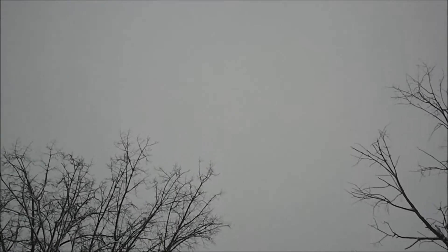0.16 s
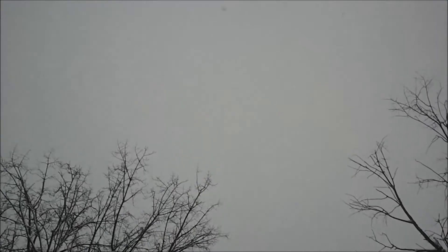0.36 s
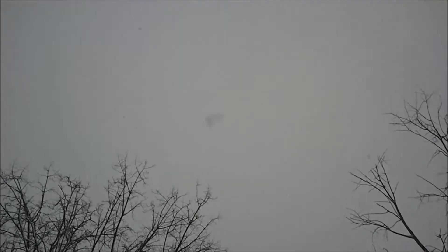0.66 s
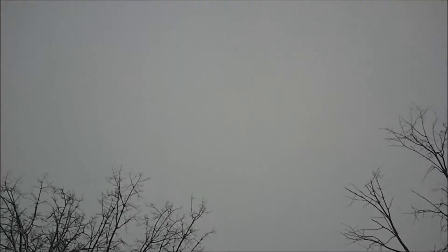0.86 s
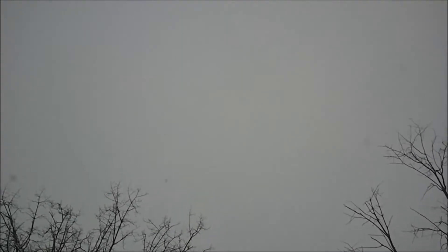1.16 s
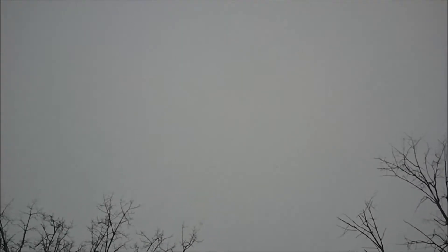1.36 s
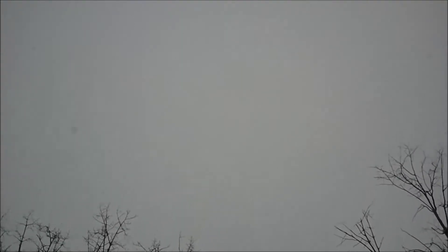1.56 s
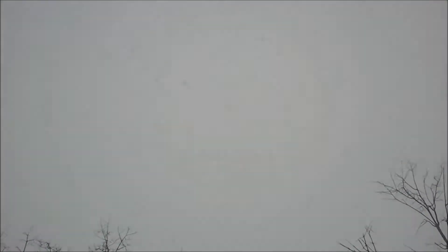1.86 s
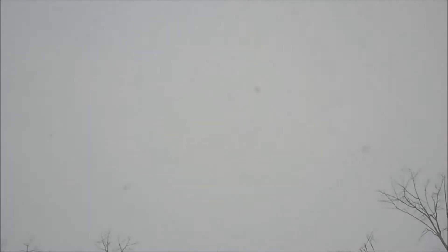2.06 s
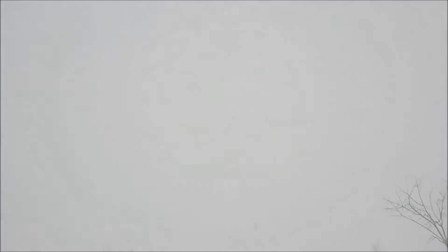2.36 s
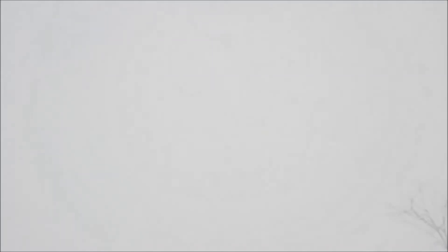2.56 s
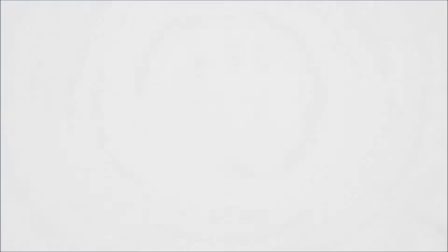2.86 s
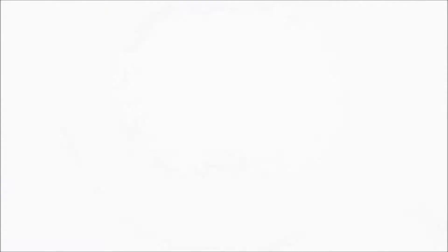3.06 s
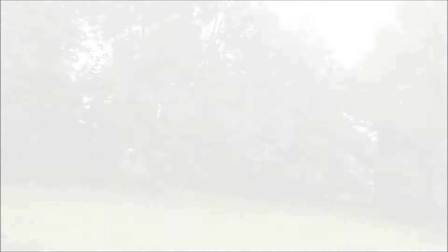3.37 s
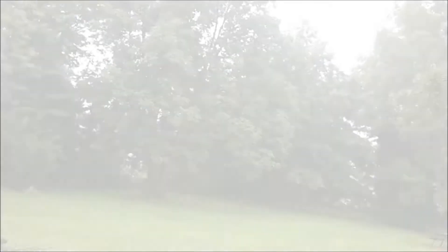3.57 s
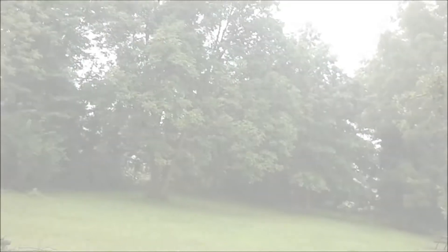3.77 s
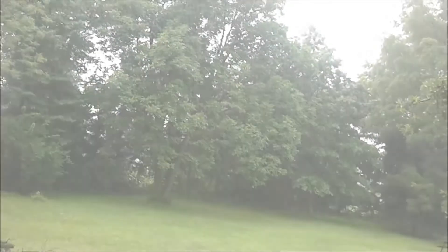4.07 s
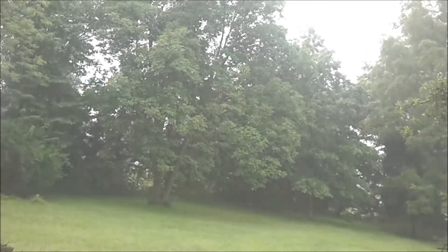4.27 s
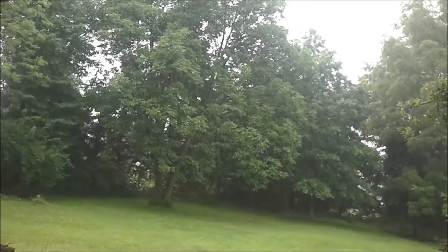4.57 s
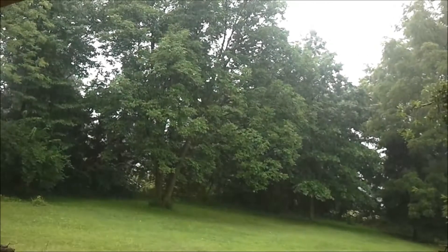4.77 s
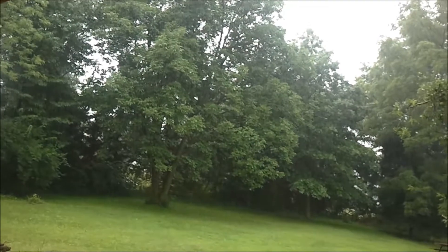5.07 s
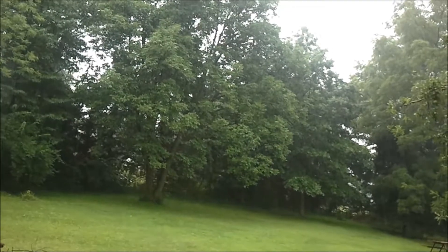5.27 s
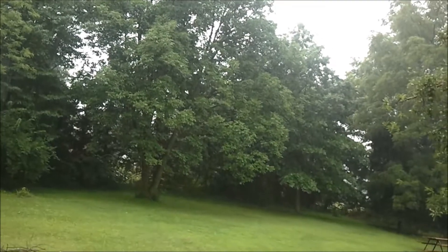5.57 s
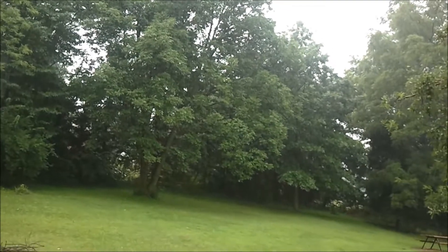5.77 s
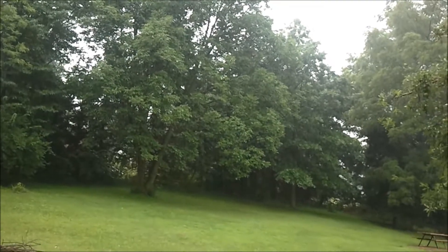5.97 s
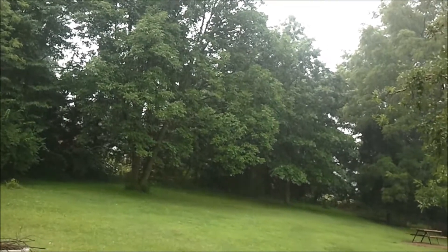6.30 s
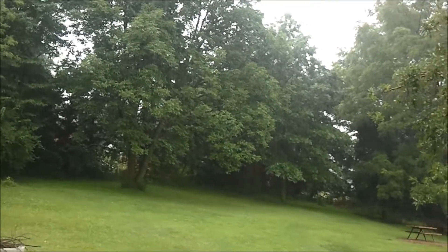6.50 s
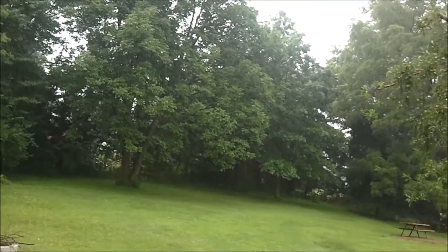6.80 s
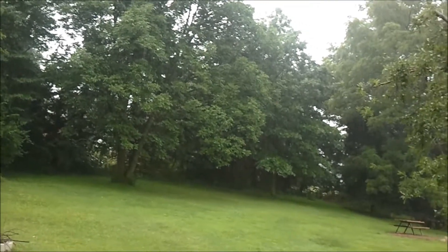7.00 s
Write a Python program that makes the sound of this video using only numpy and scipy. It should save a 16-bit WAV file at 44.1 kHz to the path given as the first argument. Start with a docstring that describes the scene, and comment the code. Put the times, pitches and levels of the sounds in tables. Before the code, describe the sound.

Sparse bright ticks of icy specks over a faint outdoor hush die away; after a brief gap, dense leafy rain grows louder.

```python
"""Outdoors, in two scenes joined by a fade through silence, on a small camera with a narrow band.
First a winter hush of shaped noise: icy specks ring as damped ticks close to the microphone,
and the hand bumps the camera in soft, low thuds with a few short creaks.
Then steady summer rain on trees and lawn fades in: noise with drifting patches for the far drops,
short leaf rings for the nearer ones, and slaps with spray for the largest."""
import sys
import numpy as np
from scipy import signal
from scipy.fft import rfft, irfft, next_fast_len
from scipy.io import wavfile
from scipy.ndimage import uniform_filter1d

SR = 44100
rng = np.random.default_rng(int(sys.argv[2]) if len(sys.argv) > 2 else 0)


def inscribe(sig):
    """Save sig as 16-bit PCM at rate SR to the path in sys.argv[1].

    A 1-D sig is mono; a 2-D sig holds one channel per row.
    Samples are clipped to [-1, 1] before scaling.
    """
    pcm = np.round(np.clip(np.atleast_2d(sig).T, -1, 1) * 32767)
    wavfile.write(sys.argv[1], SR, pcm.astype(np.int16))


N = 314854
TIME = np.arange(N) / SR
CUT_S = 3.24  # the hush gives way to the rain


def gain_of(db):
    """Logarithmic level: decibels to amplitude gain."""
    return 10 ** (np.asarray(db) / 20)


def evened(x):
    """Normalisation: scales a signal to rms 1."""
    return x / np.sqrt(np.mean(x ** 2) + 1e-20)


def read(points, hz):
    """Interpolation: reads a spectrum table along a logarithmic frequency axis."""
    point_hz, value_db = np.transpose(points)
    return np.interp(np.log(hz + 1), np.log(point_hz + 1), value_db)


def moments(start_s, length_s, per_s):
    """Random arrivals: independent event times in a span, at a mean rate."""
    inside = (TIME >= start_s) & (TIME < start_s + length_s)
    return TIME[(rng.random(N) < per_s / SR) & inside]


def add(mix, start_s, sound):
    """Superposition: adds a sound to the mix in place from start_s."""
    part = mix[max(round(start_s * SR), 0):][:len(sound)]
    part += sound[:len(part)]


# Steep upper limit of the recorder's treble: pitch_hz, level_db
TREBLE_SHOULDER = [(6800, 0), (7200, -7), (7500, -10.5), (7800, -43.5), (8300, -63)]


def coloured(x, points):
    """Spectral shaping: filters x by a colour and the treble shoulder, then sets rms 1."""
    size = next_fast_len(N)
    hz = np.fft.rfftfreq(size, 1 / SR)
    shape_db = read(points, hz) + read(TREBLE_SHOULDER, hz)
    return evened(irfft(rfft(x, size) * gain_of(shape_db), size)[:N])


def ping(t, hz, rise_s, phase=0):
    """Critically damped envelope on a sine: it peaks at height 1 after rise_s, then dies away."""
    u = np.maximum(t, 0) / rise_s
    return u * np.exp(1 - u) * np.sin(2 * np.pi * hz * t + phase)


# Relative noise density of the far air: pitch_hz, level_db (per Hz)
HUSH_COLOUR = [(20, 1.5), (60, -1), (200, -3), (350, -5.5), (600, -8.5), (1000, -12), (1800, -16.5),
               (3000, -21.5), (4500, -21), (6600, -19)]


def hush(level_db=-57.5):
    """Stationary noise: far, even outdoor air has a fixed spectrum and no events."""
    return gain_of(level_db) * coloured(rng.standard_normal(N), HUSH_COLOUR)


# Relative noise density of the merged far drops: pitch_hz, level_db (per Hz)
WASH_COLOUR = [(20, -18.5), (50, -15), (90, -13), (160, -6.5), (240, -2.5), (320, 0.5), (520, -2.5),
               (820, -1.5), (1300, -4), (1980, -9.5), (2400, -15.5), (3000, -22.5), (4500, -22),
               (6700, -21)]


def wash(patchy_db=1.08, flicker_db=.45):
    """Incoherent summation: countless far drops merge into noise with drifting patches."""
    z = signal.stft(rng.standard_normal(N), nperseg=512, noverlap=384)[2]
    # smooth over neighbouring frequencies, then over time
    patches = uniform_filter1d(rng.standard_normal(z.shape), size=7, axis=0)
    patches = evened(uniform_filter1d(patches, size=18, axis=1))
    flicker = evened(uniform_filter1d(rng.standard_normal(z.shape[1]), size=8))
    z = z * gain_of(patchy_db * patches + flicker_db * flicker)
    return coloured(signal.istft(z, nperseg=512, noverlap=384)[1][:N], WASH_COLOUR)


# Relative density of the drops on leaves: pitch_hz, level_db (per Hz)
LEAF_COLOUR = [(100, -19), (400, -0.5), (900, 4), (2000, 3.5), (2450, -15.5), (3000, -15), (4500, -24.5),
               (6700, -22.5)]


def leaves(per_s=1100, spread_db=4.0, cycles=0.86, count=36):
    """Impulse response: each nearer drop slaps one of many leaves, each with its own short ring."""
    size_db = spread_db * np.minimum(rng.exponential(1, N), 3.5)
    drops = gain_of(size_db) * (rng.random(N) < per_s / SR)
    leaf, t, out = rng.integers(0, count, N), np.arange(600) / SR, np.zeros(N)
    for k, hz in enumerate(np.geomspace(550, 6500, count)):
        slap = evened(ping(t, hz, cycles / hz)) + 0.93 * evened(ping(t, 5000, .00008))
        out += signal.oaconvolve(drops * (leaf == k), slap)[:N]
    brightened = np.diff(out, prepend=0) + 0.34 * out
    return coloured(brightened, LEAF_COLOUR)


# Soft bumps of the hand on the camera: start_s, level_db (nominal peak), pitch_hz
HAND_BUMPS = [(.048, -36.5, 80.4), (.128, -39.5, 65), (.199, -34.5, 100), (.264, -46, 180),
              (.434, -45, 247), (0.609, -44, 162), (.699, -46.5, 119), (.878, -41.5, 172), (.893, -43, 62),
              (1.694, -49, 60), (1.978, -47, 219), (2.036, -42, 130), (2.141, -44, 115)]
# Short creaks of the case: start_s, length_s, level_db (nominal peak of the first slip), pitch_hz (mean)
CASE_CREAKS = [(1.215, .005, -47, 4450), (1.228, .025, -44.5, 4450), (1.266, .005, -46, 4480),
               (3.039, .01, -35, 3630)]
# A creak is a run of slips that weaken, each a little off pitch (share of the mean)
SLIP_S, SLIP_FALL_DB_PER_S, SLIP_DETUNE = .0065, 300, 0.044


def handling(bump_rise_s=0.0045, rub_db=-11, rub_s=0.012, creak_rise_s=0.0012, undertone_db=-14):
    """Forced vibration and stick-slip: the case thuds with a little rubbing noise, and creaks."""
    out, t = np.zeros(N), np.arange(5000) / SR
    rub_colour = [(60, -1), (300, 3), (600, -1.0), (1500, -17.5), (4000, -48.5)]
    rub = coloured(rng.standard_normal(N), rub_colour)
    for start_s, level_db, hz in HAND_BUMPS:
        # a push on the case, then the skin slides
        push = .7 * ping(t, hz, bump_rise_s)
        slide = gain_of(rub_db) * rub[round(start_s * SR):][:len(t)] * np.exp(-t / rub_s)
        add(out, start_s, gain_of(level_db) * (push + slide))
    for start_s, length_s, level_db, mean_hz in CASE_CREAKS:
        for lag_s in np.arange(0, length_s, SLIP_S):
            hz = mean_hz * (1 + SLIP_DETUNE * rng.uniform(-0.92, 1))
            # two close modes beat over a weak one an octave down
            pair = sum(ping(t, hz * detune, creak_rise_s, 2 * np.pi * rng.random())
                       for detune in (.955, 1.045))
            slip = 0.85 * pair + gain_of(undertone_db) * ping(t, hz / 2, creak_rise_s)
            add(out, start_s + lag_s, gain_of(level_db - SLIP_FALL_DB_PER_S * lag_s) * slip)
    return out


def speck(level_db, hz, body_db, rise_s=0.00013, rebound=0.7, body_hz=1050, shell_hz=2750,
          shell_db=-3, body_rise_s=0.00021, scatter_db=-26, scatter_s=.003):
    """Modal impact: a hard speck gives a bright ring, a quick rebound, two dull modes and scatter."""
    t = np.arange(800) / SR
    lag, a, b, c, d, detune, stiff, lively = rng.random(8)
    ring = ping(t, hz, rise_s, 2 * np.pi * a)
    # the rebound, within a millisecond, cuts different notches into every tick
    again = ping(t - .0004 - 0.000595 * lag, hz, rise_s, 2 * np.pi * b)
    ring = ring + rebound * (.5 + lively) * again
    scatter = np.convolve(rng.standard_normal(len(t)), ping(t, hz, rise_s))[:len(t)]
    ring = ring + gain_of(scatter_db) * evened(scatter) * np.exp(-t / scatter_s)
    # so small a source radiates no bass
    ring = signal.lfilter(*signal.butter(2, 3800, "high", fs=SR), ring)
    body = ping(t, body_hz * 2 ** (detune - .5), body_rise_s, np.pi * (c - .5) / 2)
    shell = ping(t, shell_hz * (0.87 + 0.44 * stiff), body_rise_s, 2 * np.pi * d)
    body = body + gain_of(shell_db) * shell
    one_ms = np.sqrt(SR / 1000 / len(t))  # refers the ring's energy to one millisecond
    return gain_of(level_db) * one_ms * (evened(ring) + gain_of(body_db) * evened(body))


# Loudest close ticks: start_s, level_db (ring over one millisecond, before the fade),
# pitch_hz (ring), body_db (dull body relative to the ring)
CLOSE_TICKS = [(0.0177,-42,6250,-26), (0.0442,-37,6440,-16), (.117,-34.5,6570,-4), (.1201,-28.5,6430,-13),
               (.191,-39,6340,-10), (.344,-41,5300,-4), (.354,-39,6540,-24), (.382,-20.5,6530,-21),
               (0.5181,-33,5660,-8.5), (0.5348,-29.5,6400,-18), (.5467,-42,5800,-12), (0.601,-37,6300,-26),
               (0.6238,-35.5,6400,-11.5), (.7428,-39,6800,-23), (0.7683,-40,6350,-22),
               (.826,-34.5,6100,-34), (.8449,-41,6400,-4.5), (.8541,-37.5,6550,-15), (0.9174,-33,6900,-23),
               (.9767,-39,6200,-26), (1.1028,-24.5,6560,-16), (1.123,-41,6100,-10), (1.1686,-37,6300,-11),
               (1.2058,-36,6400,-24), (1.2128,-38,6200,-10), (1.259,-31,6270,-12.5),
               (1.3097,-29.5,5130,-13.5), (1.3773,-42.5,6300,-22), (1.455,-34,6400,-9),
               (1.4787,-21.5,5900,-16.5), (1.5465,-37.5,6020,-8.5), (1.7121,-32,6750,-32),
               (1.7428,-36,6660,-16), (1.7798,-37,6200,-11), (1.8963,-29.5,6560,-19), (1.9982,-37,6280,-9),
               (2.0503,-35,6200,-8), (2.1447,-30,5900,-13.5), (2.201,-34.5,6460,-11), (2.2408,-25,6900,-11),
               (2.264,-34,6600,-17), (2.3143,-35,6570,-7.5), (2.3957,-38,5700,-4), (2.461,-38.5,5600,-21),
               (2.6965,-34,6400,-26), (2.8031,-20.5,5650,-20), (2.8576,-36.5,6250,-7.5),
               (3.0396,-18,6400,-22.5), (3.07,-34,6020,-11)]
# Flurries of fainter specks: start_s, length_s, rate_per_s, level_db (of the weakest)
SPECK_FLURRIES = [(0.931, .14, 69, -54.5), (1.202, .16, 130, -54.5), (1.5, .13, 80, -53),
                  (2.17, .31, 220, -53.5), (2.76, 0.192, 185, -55.5)]
# Stray specks fall throughout the hush; the level is that of the weakest
STRAY_PER_S, STRAY_DB = 28, -56.5


def ticks(spread_db=4.5, faint_hz=6500, faint_body_db=-17, faint_edge_hz=7450):
    """Random impacts: close ticks over a slightly duller patter of faint ones with flurries."""
    close, faint = np.zeros((2, N))
    for start_s, level_db, hz, body_db in CLOSE_TICKS:
        add(close, start_s, speck(level_db, hz, body_db))
    for start_s, length_s, per_s, level_db in [(0, CUT_S, STRAY_PER_S, STRAY_DB), *SPECK_FLURRIES]:
        for moment_s in moments(start_s, length_s, per_s):
            size_db = spread_db * min(rng.exponential(), 3)
            hz = faint_hz * rng.uniform(.92, 1.08)
            add(faint, moment_s, speck(level_db + size_db, hz, faint_body_db))
    return close + signal.oaconvolve(faint, signal.firwin(201, faint_edge_hz, fs=SR), "same")


# Largest drops: start_s, level_db (slap's envelope peak, before the fade), pitch_hz,
# bright_db (added to the common spray level)
LARGE_SPLATS = [(4.382, -22.5, 1500, -3), (4.576, -31, 1690, 7.5), (4.652, -21, 1010, -10),
                (4.792, -22.5, 1530, -7), (6.314, -20.5, 706, -11), (6.548, -17, 830, -21),
                (6.9, -21.5, 1700, -9)]
# Lesser drops land at random, their pitch spread around SPLAT_HZ
SPLATS_PER_S, SPLAT_DB, SPLAT_HZ, SPLAT_BRIGHT_DB = 4, -25, 1110, -5
RAIN_DB = -31.5  # common gain of wash and leaves


def rain(wash_db=-1, leaves_db=-7.5, splat_rise_s=0.00054, spray_db=-9, spray_s=0.001):
    """Impact and spray: large drops slap and fizz close by, over a steady wash and leaf patter."""
    out = gain_of(RAIN_DB) * (gain_of(wash_db) * wash() + gain_of(leaves_db) * leaves())
    t = np.arange(700) / SR
    fizz_colour = [(300, -18.5), (2000, 1), (4500, -2.5), (6700, -3)]
    fizz = coloured(rng.standard_normal(N), fizz_colour)
    lesser = [(start_s, SPLAT_DB, SPLAT_HZ * 2 ** rng.uniform(-0.55, 0.69), SPLAT_BRIGHT_DB)
              for start_s in moments(CUT_S, N / SR, SPLATS_PER_S)]
    for start_s, level_db, hz, bright_db in [*LARGE_SPLATS, *lesser]:
        slap = ping(t, hz, splat_rise_s)
        grain = fizz[round(start_s * SR) - len(t):][:len(t)]
        spray = grain * t / spray_s * np.exp(1 - t / spray_s)
        add(out, start_s, gain_of(level_db) * (slap + gain_of(spray_db + bright_db) * spray))
    return out


FADE_OUT_S, SILENT_S, REOPEN_S = .73, 3.19, 3.285
# The rain shows faintly for a moment, dying with this time constant, before its fade opens
GLIMPSE_DB, GLIMPSE_S = -52, 0.12
# The fade in opens along an S curve while a steady climb passes 0 dB at UNITY_S and goes on rising
FADE_IN_S, OPEN_S, OPEN_POWER, CLIMB_DB_PER_S, UNITY_S = 3.485, 1.013, 2.33, 3.5, 6.5


def fade():
    """Amplitude envelope: a straight fade to silence, a faint glimpse, then an S-shaped opening."""
    closing = np.interp(TIME, [FADE_OUT_S, SILENT_S], [1, 0])
    glimpse = gain_of(GLIMPSE_DB) * np.exp(-abs(TIME - REOPEN_S) / GLIMPSE_S) * (TIME > REOPEN_S)
    opening = 1 - np.exp(-(np.maximum(TIME - FADE_IN_S, 0) / OPEN_S) ** OPEN_POWER)
    return closing + glimpse + opening * gain_of(CLIMB_DB_PER_S * (TIME - UNITY_S))


def scene():
    """Succession: the winter hush up to CUT_S, then the rain."""
    winter = hush() + handling() + ticks()
    return np.where(TIME < CUT_S, winter, rain())[None]


def record(dry, offset=-.0066, soft_edge_hz=7400, edge_hz=8269):
    """Band limiting: the recorder softens the treble and adds an offset; then fade and final edge."""
    soft = signal.oaconvolve(dry, signal.firwin(121, soft_edge_hz, fs=SR)[None], "same")
    faded = (soft + offset) * fade()
    band = signal.firwin(255, edge_hz, window=("kaiser", 8), fs=SR)
    return signal.oaconvolve(faded, band[None], "same")


dry = scene()
out = record(dry)
inscribe(out)
```